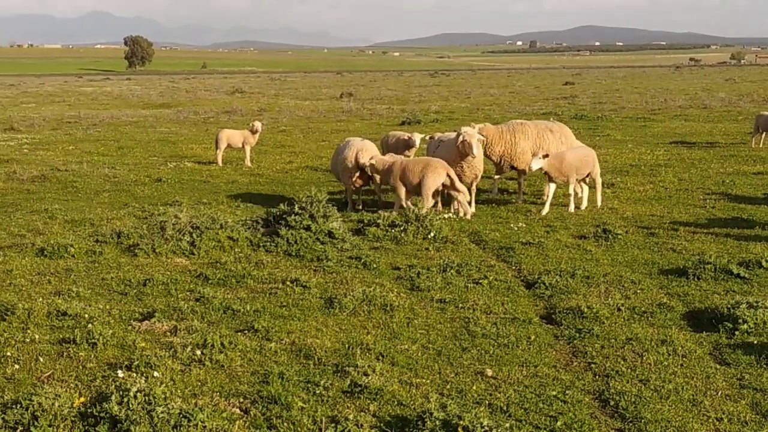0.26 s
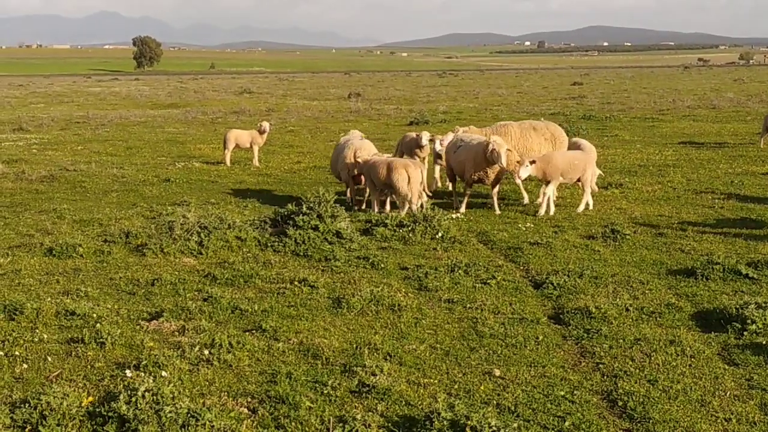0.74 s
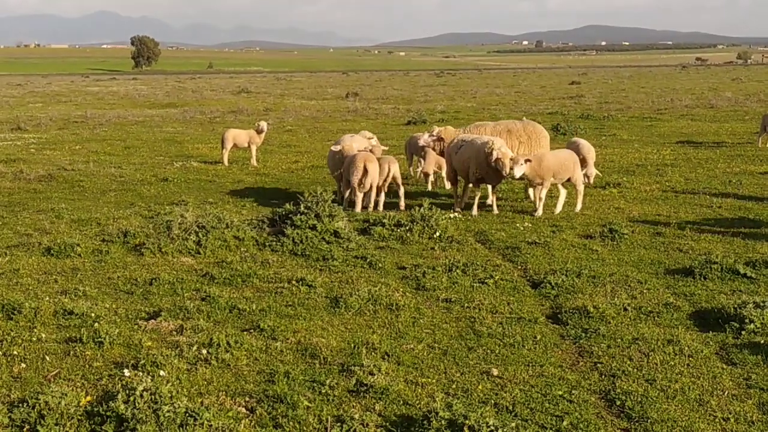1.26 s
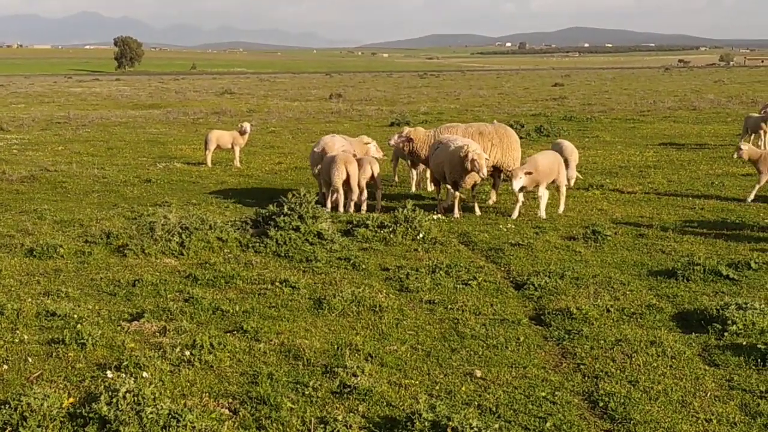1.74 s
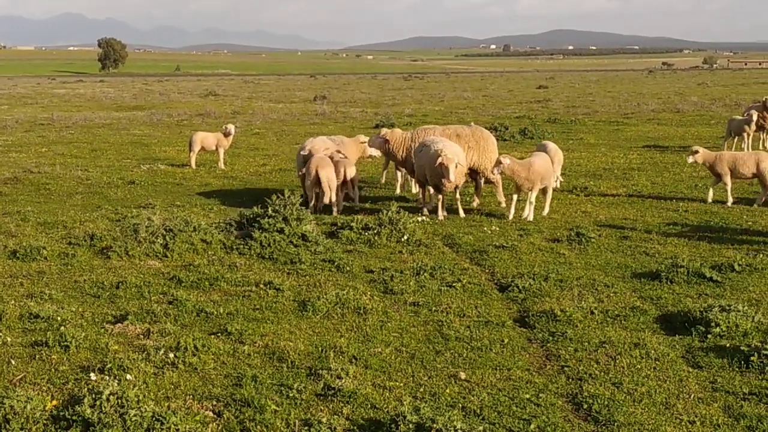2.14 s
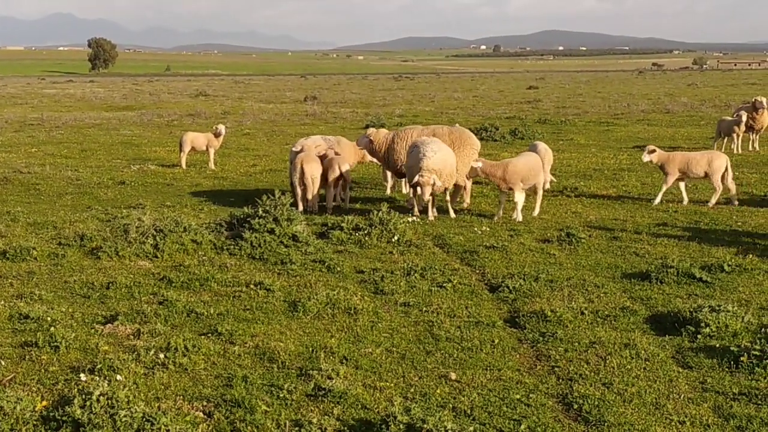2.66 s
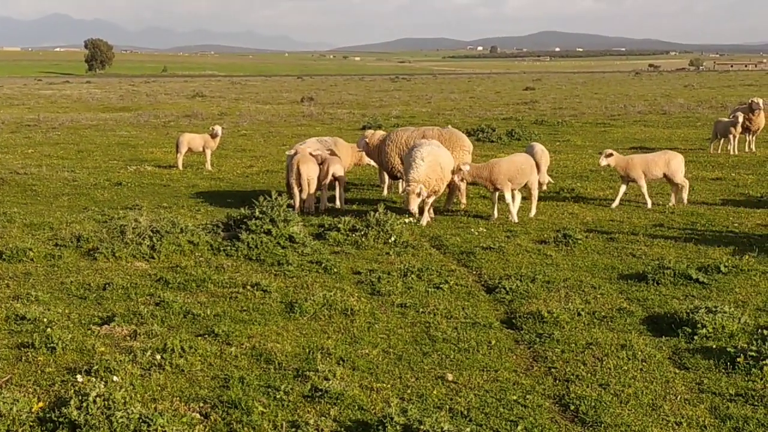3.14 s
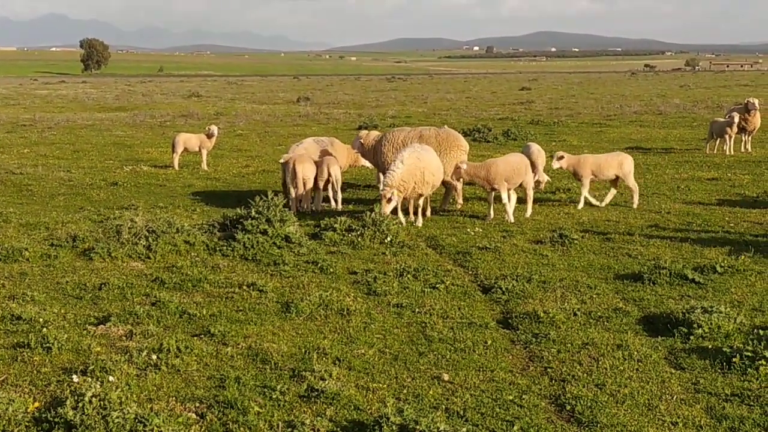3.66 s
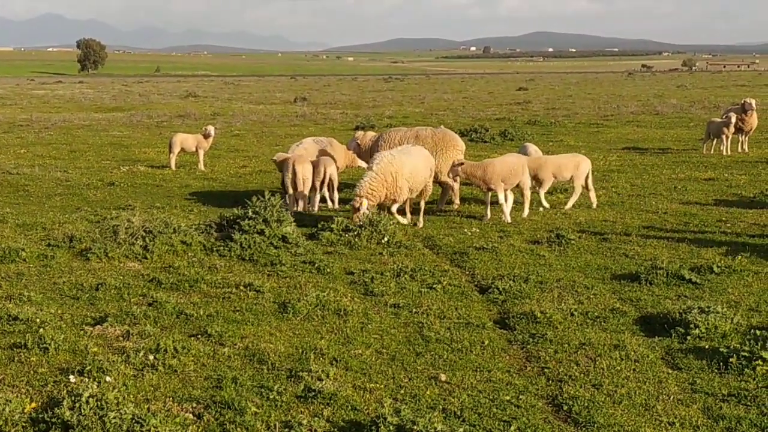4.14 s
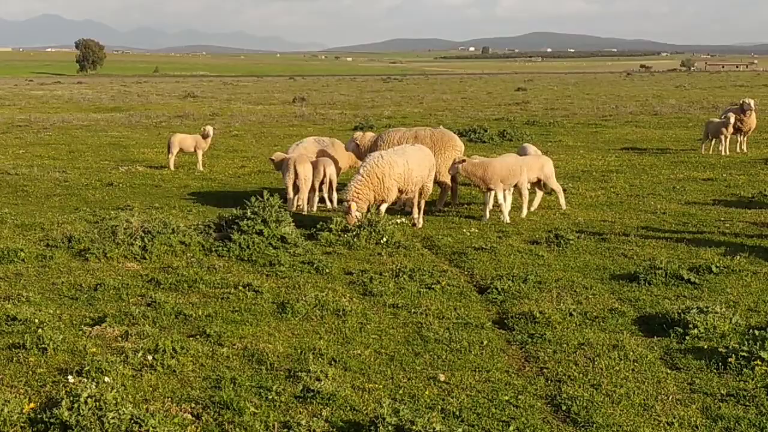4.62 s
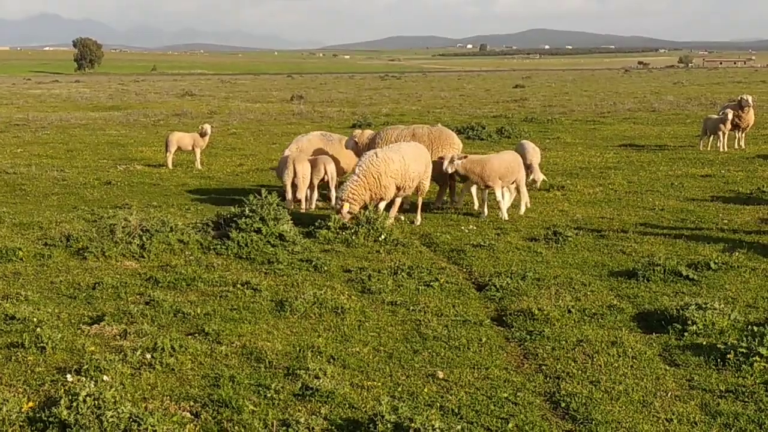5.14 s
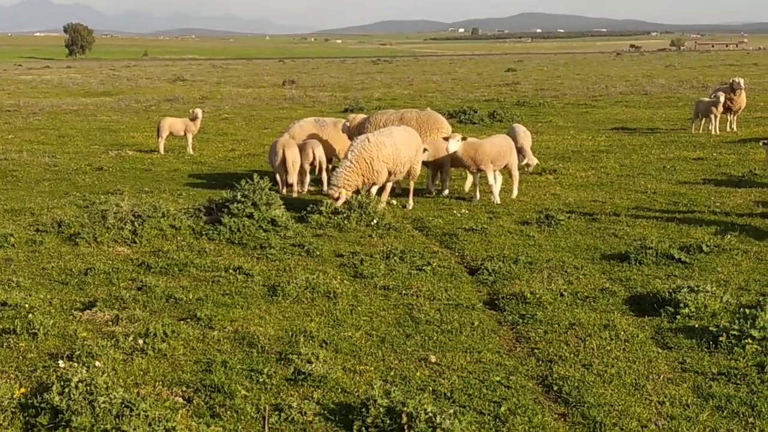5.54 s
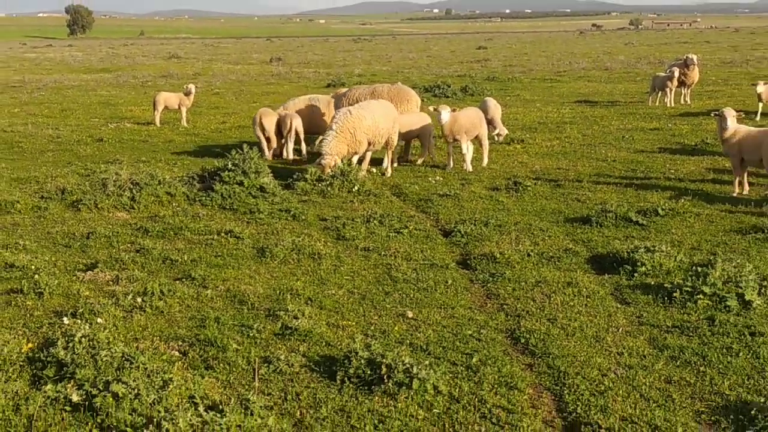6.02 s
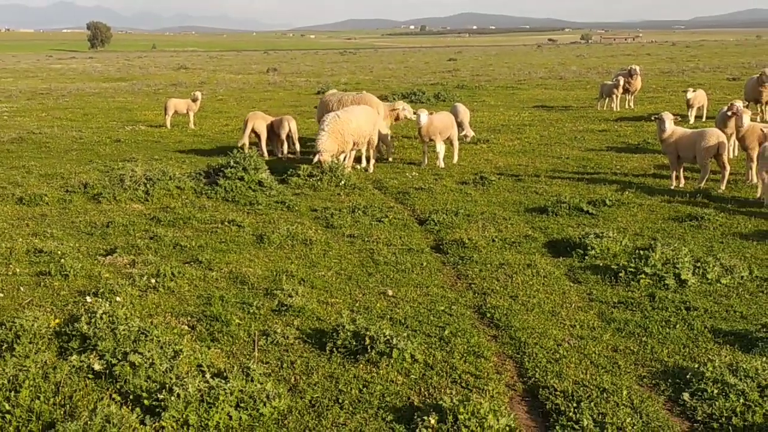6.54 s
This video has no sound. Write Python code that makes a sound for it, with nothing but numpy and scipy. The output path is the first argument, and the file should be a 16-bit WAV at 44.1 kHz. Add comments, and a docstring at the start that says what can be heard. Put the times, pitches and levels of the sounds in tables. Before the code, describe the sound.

Sheep and lambs bleat in turn across an open pasture, near and far, while wind buffets the microphone and swells into one heavy gust.

```python
"""Open pasture, from a hand-held camera: ewes and lambs bleat in turn and across each other, near and far.
Vocal-fold pulses with puffs of air ring each throat; reflections scatter far voices more. Bands of noise make
the wind that buffets two ports, mostly the left, and builds to one strong gust. A far bird chirps twice in
gliding tones, and the camera body ticks in snaps of noise and short knocks. Still air adds a faint even hush of
coloured noise."""
import sys
import numpy as np
from scipy import signal
from scipy.fft import rfft, irfft, next_fast_len
from scipy.io import wavfile
from scipy.ndimage import map_coordinates

SR = 44100
rng = np.random.default_rng(int(sys.argv[2]) if len(sys.argv) > 2 else 0)


def file_out(sig):
    """Save sig as 16-bit WAV at sys.argv[1]."""
    # one column per channel
    cols = np.atleast_2d(sig).T
    # limit, then scale
    lim = np.clip(cols, -1, 1)
    pcm = np.round(lim * 32767).astype(np.int16)
    wavfile.write(sys.argv[1], SR, pcm)


N = 299438
TIME = np.arange(N) / SR


def amp(db):
    """Decibels to gain."""
    return 10 ** (np.asarray(db) / 20)


def unit(x):
    """Scales to rms 1."""
    return x / np.sqrt(np.mean(x ** 2) + 1e-20)


def read(points, hz):
    """Reads a spectrum on a log-frequency axis."""
    f, value = np.transpose(points)
    return np.interp(np.log(hz + 1), np.log(f + 1), value)


def add(mix, s, sound):
    """Mixes a stereo sound in at time s; it may have begun before zero."""
    at = round(s * SR)
    sound = sound[:, max(-at, 0):]
    part = mix[:, max(at, 0):][:, :sound.shape[1]]
    part += sound[:, :part.shape[1]]


def wander(size, hz):
    """Smooth random fluctuation of rms 1, mostly slower than hz."""
    f = np.fft.rfftfreq(size, 1 / SR)
    lowpass = 1 / (1 + (f / hz) ** 2) ** 2
    return unit(irfft(rfft(rng.standard_normal(size)) * lowpass, size))


# still air over the pasture, relative spectrum: (frequency [Hz], density [dB])
AIR = [(150, 14), (700, -11), (1300, -9.5), (2300, -11.5), (3700, -27), (5200, -22), (6700, -24.5),
       (8900, -19.5), (15000, -60)]
AIR_DB = -44.5


def air():
    """A faint even hush: steady coloured noise, independent at each port."""
    colour = amp(read(AIR, np.fft.rfftfreq(N, 1 / SR)))
    hush = irfft(rfft(rng.standard_normal((2, N))) * colour, N)
    return amp(AIR_DB) * unit(hush)


# chirps of the far bird: (time [s], length [s], peak level [dB])
CHIRPS = [(2.682, 0.033, -61), (2.978, 0.036, -66)]


def bird(low_hz=3500, top_hz=4580):
    """A small far bird, equal at both ports: each chirp slides up and levels off."""
    out = np.zeros((2, N))
    for s, length, level_db in CHIRPS:
        u = np.arange(0, length, 1 / SR) / length
        hz = top_hz - (top_hz - low_hz) * (1 - u) ** 2
        turns = np.cumsum(hz) / SR
        chirp = np.sin(np.pi * u) * np.sin(2 * np.pi * turns)
        add(out, s, amp(level_db) * chirp[None])
    return out


# breeze between the gusts: (left pressure [dB], right pressure [dB])
BREEZE_DB = (-46, -41.5)
# gusts on the microphone: (start [s], hold [s], left pressure [dB], right pressure [dB])
GUSTS = [(0.166, 0.068, -21.5, -31.5), (0.275, 0.16, -27, -36.5), (0.371, 0.14, -25, -59),
         (0.579, 0.043, -30.5, -55), (0.755, 0.0071, -24.5, -55), (1.011, 0.036, -25, -40),
         (1.331, 0.04, -19.5, -40), (1.408, 0.414, -33.5, -36), (2.419, 0.071, -24.5, -32),
         (2.718, 0.22, -32.5, -32), (2.915, 0.24, -28, -33), (3.044, 0.053, -40, -21),
         (3.3, 0.24, -26.5, -37), (3.841, 0.05, -26.5, -32), (3.93, 0.17, -21.5, -23.5),
         (4.204, 0.13, -24, -25), (4.4, 0.15, -34.5, -28), (4.748, 0.032, -29.5, -22.5),
         (4.826, 0.088, -23, -27), (4.891, 0.76, -17.5, -23), (5.176, 0.045, -9, -29),
         (5.376, 0.14, -14, -42), (5.69, 0.2, -19.5, -27.5), (5.901, 0.19, -28, -18.5),
         (6.282, 0.29, -28.5, -60), (6.427, 0.023, -15, -51), (6.75, 0.088, -45, -23.5)]
# every gust builds quickly and dies away more slowly (time constants of its pressure)
GUST_ATTACK_S, GUST_RELEASE_S = 0.015, 0.029


def pressure(port):
    """Wind pressure in dB at one port (0 left, 1 right): gusts pile up on a light breeze."""
    power = np.full(N, amp(BREEZE_DB[port]) ** 2)
    for start, hold, *level_db in GUSTS:
        before = np.maximum(start - TIME, 0) / GUST_ATTACK_S
        after = np.maximum(TIME - start - hold, 0) / GUST_RELEASE_S
        power += amp(level_db[port]) ** 2 * np.exp(-2 * np.minimum(before + after, 20))
    return 10 * np.log10(power)


# sudden slaps of air: (time [s], jump in pressure [dB])
SLAPS = [(.2, 7.5), (0.454, 10), (1.341, 7.5), (2.732, 11), (3.954, 9.5), (4.207, 10), (4.893, 3),
         (4.923, 8), (4.992, 5), (5.091, 10), (5.127, 14.5), (5.166, 15), (5.314, 8.5), (5.366, 2.5),
         (5.415, 5)]
# relative wind spectrum at the reference pressure: (frequency [Hz], density [dB])
EDDIES = [(28, 2), (60, 3), (110, 0), (180, 3), (280, -6), (450, -18.5), (800, -33), (1500, -46.5),
          (3000, -56), (8000, -90)]
# above the reference pressure: (frequency [Hz], extra level per dB of pressure [dB/dB])
BREAKUP = [(40, -.5), (110, -0.5853), (280, 0), (450, 0.5839), (900, 1.0068), (3000, 0.5724)]
REFERENCE_DB = -25


def wind(port, trim_db, flutter_db=3, flutter_hz=70, slap_s=0.0051, count=15):
    """Eddies at one port: in a hard blow they break up into smaller ones that crackle."""
    pressure_db = pressure(port) + flutter_db * wander(N, flutter_hz)
    for s, jump_db in SLAPS:
        onset = np.clip((TIME - s) / .003 + 1, 0, 1)
        pressure_db = pressure_db + jump_db * onset * np.exp(-abs(TIME - s) / slap_s)
    over_db = pressure_db - REFERENCE_DB

    size = next_fast_len(N)
    f, noise = np.fft.rfftfreq(size, 1 / SR), rfft(rng.standard_normal(size))
    colour = unit(amp(read(EDDIES, f)))
    centres = np.geomspace(30, 4000, count)
    out = np.zeros(N)
    # overlapping bands, each following the pressure at its own rate
    for hz, share in zip(centres, np.eye(count)):
        band_gain = read(np.c_[centres, share], f)
        band = irfft(noise * colour * band_gain, size)[:N]
        out += band * amp(over_db + read(BREAKUP, hz) * np.maximum(over_db, 0))
    return out * amp(REFERENCE_DB + trim_db)


def wind_at_ports():
    """The narrow ports choke the hardest blows and pass little of their treble."""
    blows = np.array([wind(0, trim_db=5.5), wind(1, trim_db=2.5)])
    choked = .9 * np.tanh(blows / .9)
    return signal.sosfilt(signal.butter(3, 4000, fs=SR, output="sos"), choked)


# ticks of the camera body: (time [s], relative snap level [dB], knock level [dB], knock frequency [Hz])
TICKS = [(1.116, -14, -20.5, 1500), (1.181, -19.5, -23, 1500), (1.362, -14.5, -14, 1000),
         (1.6666, -15.5, -18, 970), (3.6871, -3, -4, 840), (5.642, -4, -3, 2070), (6.2602, -4.5, -2, 1370),
         (6.722, -18, -6, 1174)]


def ticks(snap_s=0.0011, knock_s=0.00028, lag_s=0.001637, right_db=-22):
    """A bright snap of plastic, then a short knock of the camera shell, close to the left port."""
    out, t = np.zeros((2, N)), TIME[:SR // 40]
    after = np.maximum(t - lag_s, 0)
    port_gain = amp([[0], [right_db]])
    for s, snap_db, knock_db, hz in TICKS:
        snap = 0.18 * rng.standard_normal(len(t)) * np.exp(-t / snap_s)
        knock = np.sin(2 * np.pi * hz * after) * np.exp(-after / knock_s)
        add(out, s, port_gain * (amp(snap_db) * snap + amp(knock_db) * knock))
    return out


def throat_ring(throat, side, valley_db=-34, size=2048):
    """Causal ring of a throat's resonances as one port (side +1 left, -1 right) hears it."""
    f = np.fft.rfftfreq(size, 1 / SR)
    power = amp(valley_db) ** 2 / (1 + (f / 2500) ** 2)
    for hz, width, db, pan in throat:
        peak = amp(db + side * pan / 2) / (1 + ((f - hz) / width) ** 2) ** 4
        power = power + peak ** 2
    tilt_db = read([(60, -45.5), (300, -2.0), (9500, 6.5), (12000, -2.5)], f)
    gain = np.sqrt(power) * amp(tilt_db)
    # minimum phase: the ring starts at once and never before its pulse
    log_gain = np.log(np.r_[gain, gain[-2:0:-1]] + 1e-7)
    ring = np.fft.ifft(np.exp(np.conj(signal.hilbert(log_gain)))).real
    # the treble of each pulse trails its bass a little, which blunts the snap
    return irfft(rfft(ring) * np.exp(-1j * np.pi * (f / 2200) ** 2), size)


def moving_ring(drive, ring, stretch):
    """Rings a filter whose resonances all shift by the factor stretch, by warping time and back."""
    clock = np.cumsum(stretch)
    moments = np.interp(np.arange(clock[-1]), clock, np.arange(len(drive)))
    warped = map_coordinates(drive, [moments], order=3)
    return map_coordinates(signal.fftconvolve(warped, ring), [clock], order=3)


# the throat's resonances follow the pitch by this power; slack folds, below the top pitch, are rougher
THROAT_FOLLOW, SLACK_ROUGH = 0.13, 2.3
# rms pitch jitter per roughness squared (share of pitch)
JITTER = .055
# air leaks through the folds in one puff a cycle: how tightly it bunches, how late it peaks (share of a cycle)
PUFF_FOCUS, PUFF_LATE = 1, 0.076
# a voice's treble lies above this frequency
TREBLE_HZ = 3440
# no bleat is quite even: its effort wavers by this much, this fast
WAVER_DB, WAVER_HZ = 1, 23
# time that a voice takes to start and to stop
VOICE_ON_S, VOICE_OFF_S = 0.046, 0.028


def voice(throat, hz, effort_db, treble_db, rough, lag_ms):
    """Sharp vocal-fold pulses, each with a puff of air, ring a throat that moves with the pitch."""
    size = len(hz)
    stretch = (hz / np.median(hz)) ** THROAT_FOLLOW
    rough = np.minimum(rough * (1 + SLACK_ROUGH * (1 - hz / hz.max())), .85)
    hz = hz * (1 + JITTER * rough ** 2 * wander(size, 90))
    turns = np.cumsum(hz) / SR

    # one pulse a cycle, of uneven strength, split between samples to keep its exact time
    at = np.flatnonzero(np.diff(np.floor(turns)))
    late = (np.ceil(turns[at]) - turns[at]) * SR / hz[at]
    strength = amp(3.8 * rough * rng.standard_normal(size))[at]
    folds = np.zeros(size)
    folds[at], folds[at + 1] = strength * (1 - late), strength * late

    # the air escapes just as the folds snap, and counts most in the treble
    leak = np.exp(PUFF_FOCUS * np.cos(2 * np.pi * (turns - PUFF_LATE)))
    puffs = leak * signal.lfilter([1, -.6], [1], rng.standard_normal(size))
    drive = (1 - rough) * unit(folds) + rough * unit(puffs)
    mellow = signal.filtfilt(*signal.butter(4, TREBLE_HZ, fs=SR), drive)
    drive = mellow + (drive - mellow) * amp(treble_db)

    left, right = (moving_ring(drive, throat_ring(throat, side), stretch) for side in (1, -1))
    left = np.roll(left, round(lag_ms * SR / 1000))
    sound = unit(np.array([left, right]))
    t = TIME[:size]
    edges = np.minimum(t / VOICE_ON_S, 1) * np.minimum((t[-1] - t) / VOICE_OFF_S, 1)
    return sound * amp(effort_db + WAVER_DB * wander(size, WAVER_HZ)) * edges


# share of its pitch by which a plain bleat starts low and ends low
SCOOP, DROOP = .2, .17
# quaver of a plain bleat: share of its pitch per roughness squared, and rate
QUAVER, QUAVER_HZ = .11, 12.5
# loudness gained per unit share of pitch quaver [dB]
QUAVER_DB = 59
# throat resonances: (frequency at median pitch [Hz], width [Hz], level before tilt [dB], left minus right [dB])
FAR_LOW_THROAT = [(407, 280, -3.5, 2), (638, 200, 2, 1.6), (1415, 240, -5.5, 1), (1840, 500, -6.5, 4.9)]
FAR_HIGH_THROAT = [(1410, 240, -2.5, 5.9), (2040, 780, -4.5, 9.7), (7950, 3600, -27, 4.5)]
RISING_THROAT = [(1890, 1670, -12.5, 6.8), (2265, 300, -10, 5.1)]
HOARSE_THROAT = [(735, 690, -3, -3), (1417, 216, 1, -12), (2110, 440, -3, 8), (2970, 1540, -9, 7),
                 (4190, 290, -7.5, -3), (6040, 1900, -18.5, 11.5), (8800, 4000, -27.5, 4)]
SINKING_THROAT = [(1370, 265, 0.5, 4.5), (1960, 620, -6, 3), (4600, 1600, -24.5, -4),
                  (7560, 3600, -25, 2.5)]
ANSWER_THROAT = [(680.3, 730, -1.5, 2.5), (1458, 340, 6.5, -7.5), (2010, 197, 9.5, 5), (2314, 390, 2, -8.5),
                 (3800, 6000, -24, -17.5), (7020, 3300, -21.5, 17)]
# plain bleats: (throat, start [s], length [s], pitch [Hz], glide [Hz/s], rise [s], fall [s],
# level [dB], swell [dB], fade [dB], roughness [0-1], left port lag [ms])
BLEATS = [ (FAR_LOW_THROAT, .71, 1, 130, -19.5, .23, 0.27, -50.5, 10, 15, .18, 0.41),
          (FAR_HIGH_THROAT, 1.04, 0.42, 166, 0, 0.087, 0.049, -52.5, 3.6, 2.4, 0.36, 0.3),
          (RISING_THROAT, 3.93, 0.97, 193, 0, .42, .6, -48, 16, 6.7, .29, 0.43),
          (HOARSE_THROAT, 4.37, .46, 160, 0, .24, 0.18, -38, 12.3, 12, .44, .45),
          (SINKING_THROAT, 4.42, .8, 140, -63, .15, 0.043, -43, 6, 2.3, .42, .5),
          (ANSWER_THROAT, 6.12, .62, 150.3, -22, 0.24, .16, -33.5, 10.6, 7.5, .27, -0.46),
          (ANSWER_THROAT, 6.72, 0.74, 160, 0, 0.094, 0.19, -40, 4.9, 9.4, 0.55, -.43)]


def bleat(throat, start, length, pitch_hz, glide, rise_s, fall_s,
          level_db, swell_db, fade_db, rough, lag_ms, soften=0.12):
    """A plain bleat: pitch and effort rise, quaver and sink together. Gives start, level and sound."""
    t = np.arange(0, length, 1 / SR)
    rising = np.maximum(1 - t / rise_s, 0) ** 2
    sinking = np.maximum(1 - (length - t) / fall_s, 0) ** 2
    shake = -QUAVER * rough ** 2 * np.cos(2 * np.pi * QUAVER_HZ * t)
    effort_db = level_db - swell_db * rising - fade_db * sinking + QUAVER_DB * shake
    hz = (pitch_hz + glide * t) * (1 - SCOOP * rising - DROOP * sinking + shake)
    # the treble fades first when the effort drops
    treble_db = soften * (effort_db - level_db)
    return start, level_db, voice(throat, hz, effort_db, treble_db, rough, lag_ms)


# throat resonances: (frequency at median pitch [Hz], width [Hz], level before tilt [dB], left minus right [dB])
OPENING_THROAT = [(692, 144, -6.5, 3), (1510, 265, -1, -4), (2120, 560, -9.5, 0), (2650, 940, -17, 11.5),
                  (4320, 9400, -28, 1.5), (6420, 1650, -22.5, 14.5), (8630, 2300, -27, 9)]
SMALL_LAMB_THROAT = [(1740, 770, 2, 2.6), (2900, 410, -4.5, 10)]
QUAVERING_THROAT = [(685, 390, -10.5, 1.6), (1464, 350, 1.5, 7.1), (2270, 720, 2.5, 5.3),
                    (2725, 374, 3.5, 9.1), (4950, 2060, -2.5, 5.5)]
ARCHING_THROAT = [(1550, 390, -4.5, 1), (2205, 860, -1, -3), (3970, 1800, -15, 4.5), (6720, 4700, -19, 9)]
# courses of the winding bleats, before surges: (time [s], pitch [Hz], effort [dB], treble [dB])
OPENING = [(-.06, 131, -35, 0), (.05, 138.5, -31.5, -1), (.11, 137, -33, -1), (.17, 130.5, -34, 0),
           (.25, 134, -33.5, 1), (.32, 131.3, -35, 1), (.35, 126, -34, 0), (.468, 118, -37, 0)]
SMALL_LAMB = [(0.698, 306, -62, -3), (.795, 454, -54, -9), (.86, 472.5, -54, -4), (.97, 465.5, -67, -1),
              (1.3, 457, -58, 6)]
QUAVERING = [(1.39, 116.7, -47, -20), (1.451, 121.4, -44.5, -13.5), (1.57, 131.8, -42.5, -23),
             (1.77, 137.3, -40, -17.5), (2.1, 137.4, -40.5, -10.5), (2.2, 133.7, -40.5, -10),
             (2.301, 131, -43.5, -24), (2.47, 125.4, -47.5, -17), (2.53, 124.5, -56.5, -21),
             (2.66, 122.2, -59, -14)]
ARCHING = [(5.66, 122.2, -47.5, -1), (5.829, 153.1, -43.5, -6), (5.912, 158.5, -40.5, -3.5),
           (6.106, 159.7, -42.5, 0.5), (6.498, 153, -47, 1.5), (6.64, 141, -46, -2)]
# the long bleat quavers in uneven surges: time [s]
SURGES = [1.502, 1.634, 1.735, 1.826, 1.926, 2.005, 2.061, 2.16, 2.23, 2.36]
# a surge lifts the pitch by this share, for about this long either side
SURGE_LIFT, SURGE_S = .044, .026
# winding bleats: (throat, course, surges, roughness [0-1], left port lag [ms])
WINDING_BLEATS = [(OPENING_THROAT, OPENING, [], .38, 0), (SMALL_LAMB_THROAT, SMALL_LAMB, [], .06, 0.38),
                  (QUAVERING_THROAT, QUAVERING, SURGES, .26, .42), (ARCHING_THROAT, ARCHING, [],
                  .22, -.918)]


def winding_bleat(throat, course, surges, rough, lag_ms):
    """Pitch, effort and treble take their own course; surges lift pitch and effort. Gives start, level, sound."""
    s, *controls = np.transpose(course)
    t = np.arange(s[0], s[-1], 1 / SR)
    hz, effort_db, treble_db = (np.interp(t, s, control) for control in controls)
    lift = SURGE_LIFT * sum(np.exp(-((t - at) / SURGE_S) ** 2) for at in surges)
    effort_db = effort_db + QUAVER_DB * lift
    return s[0], effort_db.max(), voice(throat, hz * (1 + lift), effort_db, treble_db, rough, lag_ms)


def scatter(x, t60):
    """Weak reflections: a decaying noise tail, different at each port. The short tail comes from the camera
    body near the ports, the longer one from turf and flock."""
    t = TIME[:SR // 2]
    tail = rng.standard_normal((2, len(t))) * amp(-60 * t / t60)
    return signal.fftconvolve(x, tail / np.linalg.norm(tail[0]), axes=1)[:, :N]


# bleats are near above the first level and far below the second
NEAR_DB, FAR_DB = -41, -45.5
# reflections: (level for near voices [dB], level for far voices [dB], t60 [s])
ECHOES = [(-3.5, -1.5, 0.069), (-17, -4.5, 0.2)]


def flock():
    """All the bleats, from clear to hoarse; the faint ones are far off and more scattered."""
    calls = [bleat(*row) for row in BLEATS] + [winding_bleat(*row) for row in WINDING_BLEATS]
    near, far = np.zeros((2, 2, N))
    for start, level_db, call in calls:
        distance = np.clip((NEAR_DB - level_db) / (NEAR_DB - FAR_DB), 0, 1)
        add(near, start, (1 - distance) * call)
        add(far, start, distance * call)
    out = near + far
    for near_db, far_db, t60 in ECHOES:
        out = out + scatter(amp(near_db) * near + amp(far_db) * far, t60)
    return out


def scene():
    """Still air, a far bird, wind at each port, camera ticks and the flock."""
    return air() + bird() + wind_at_ports() + ticks() + flock()


def record(dry, edge_hz=15700):
    """The recorder's ceiling and band limit."""
    held = np.clip(dry, -1, 1)
    band_limit = signal.firwin(511, edge_hz, window=("kaiser", 9), fs=SR)
    return signal.oaconvolve(held, band_limit[None], "same")


dry = scene()
out = record(dry)
file_out(out)
```